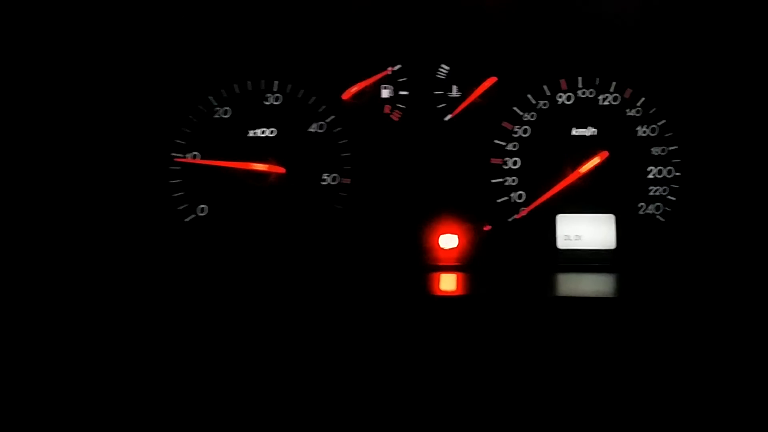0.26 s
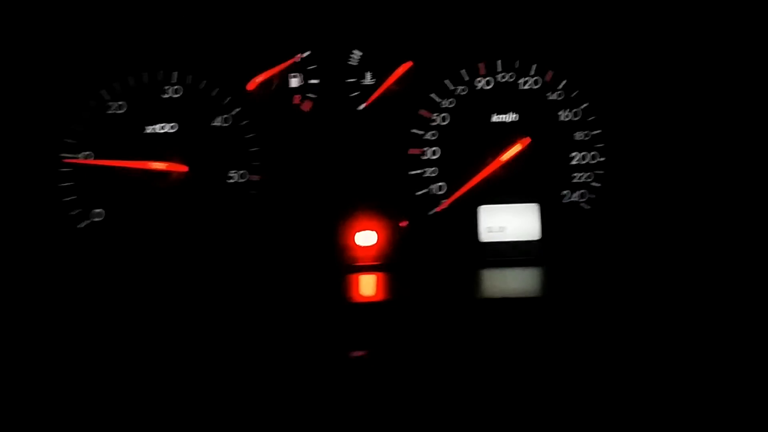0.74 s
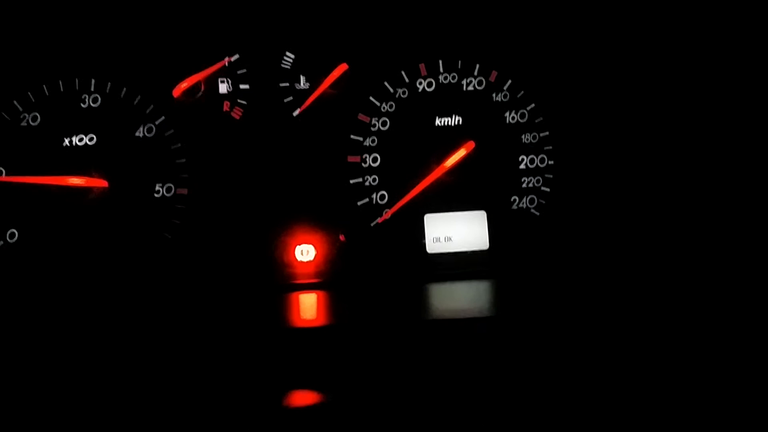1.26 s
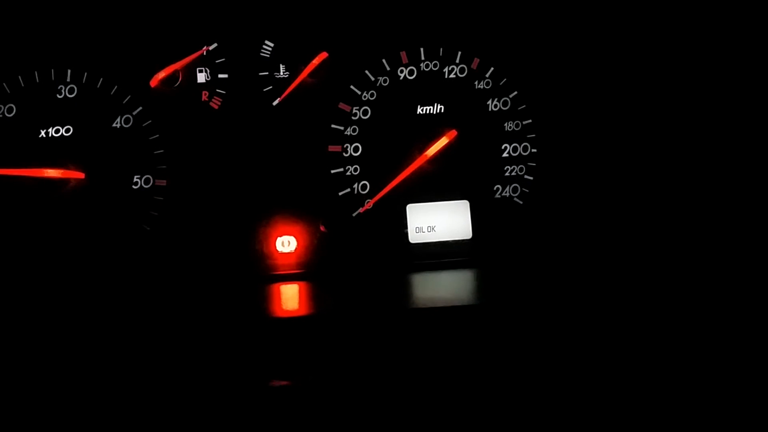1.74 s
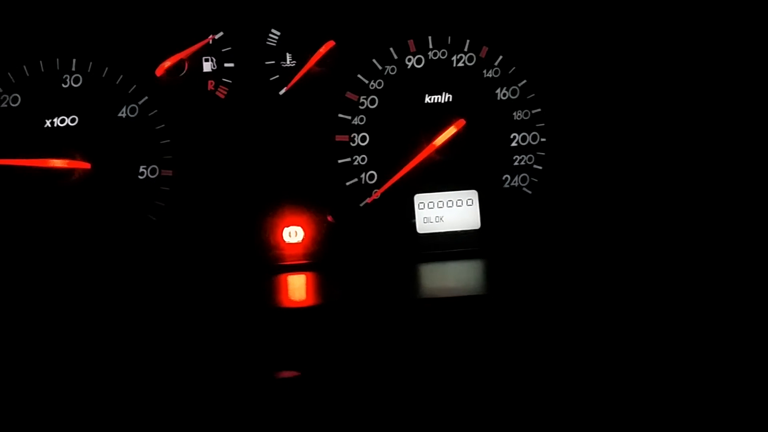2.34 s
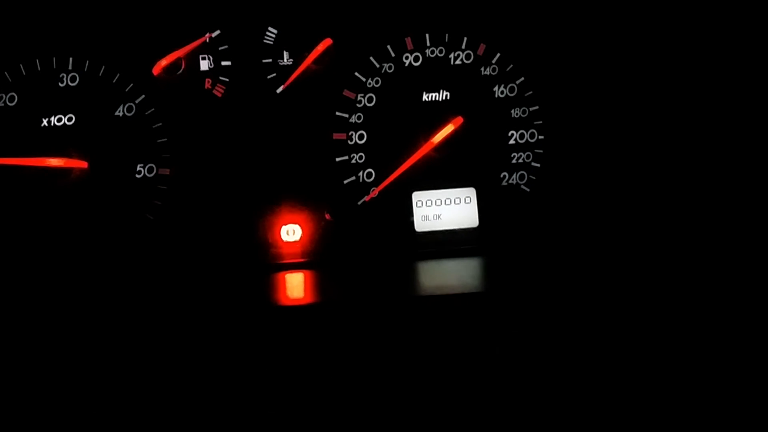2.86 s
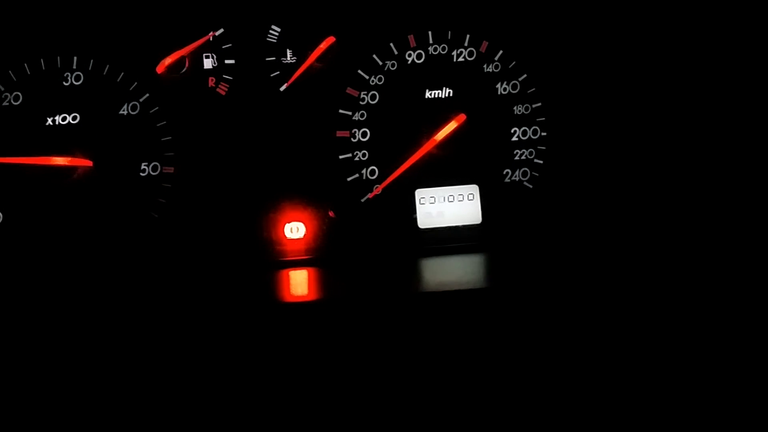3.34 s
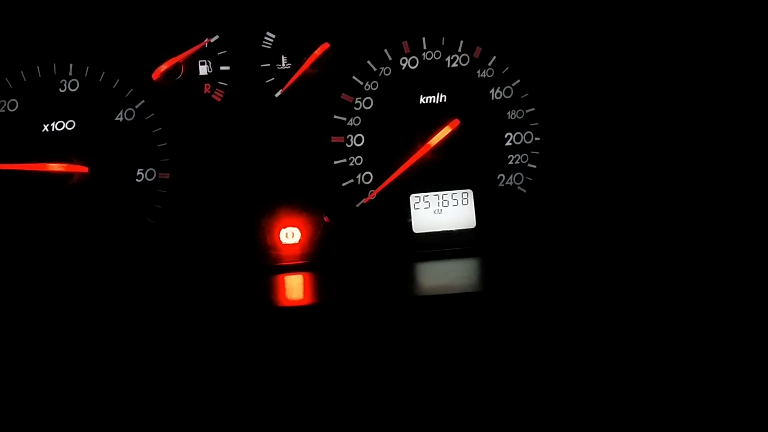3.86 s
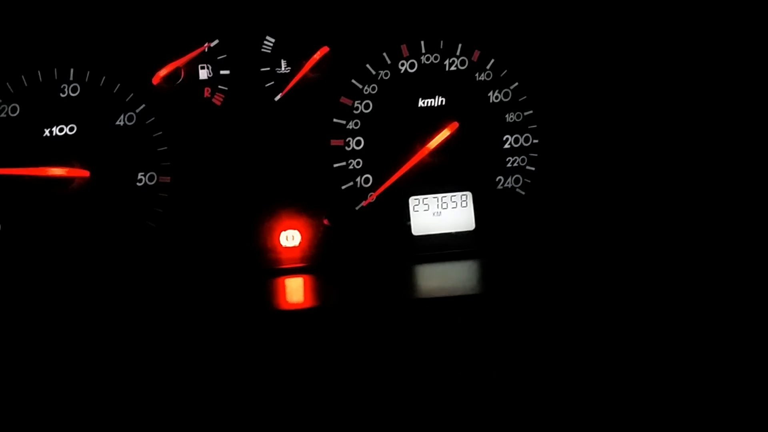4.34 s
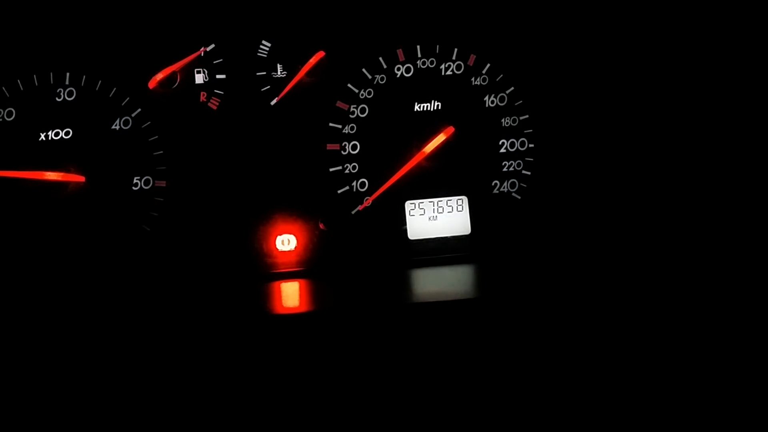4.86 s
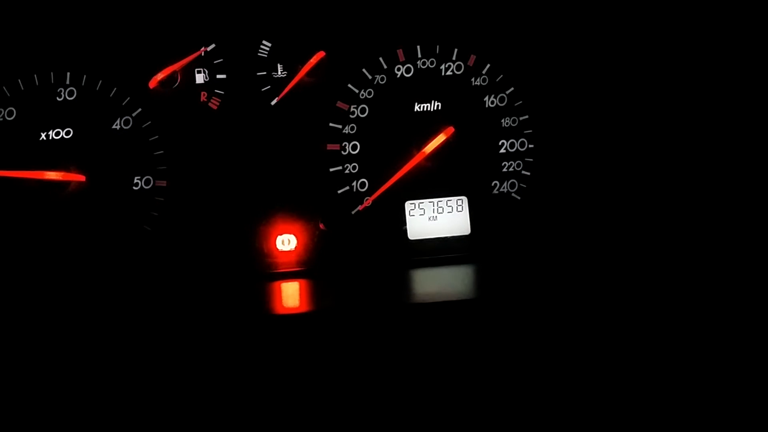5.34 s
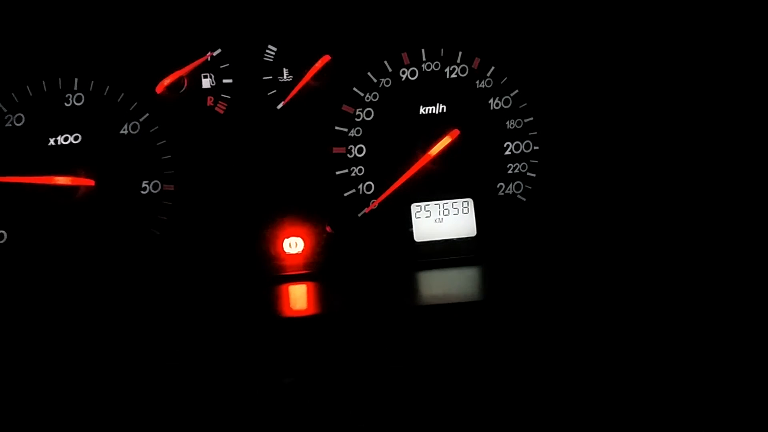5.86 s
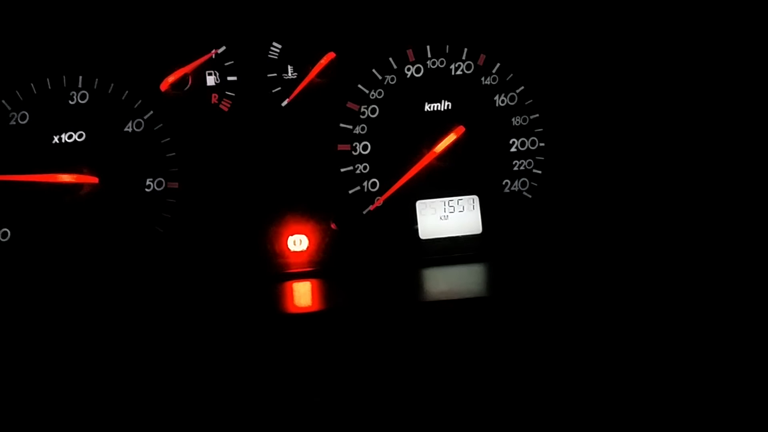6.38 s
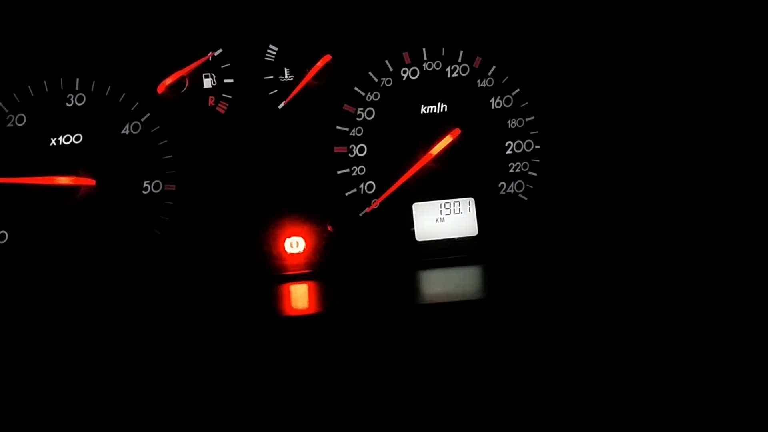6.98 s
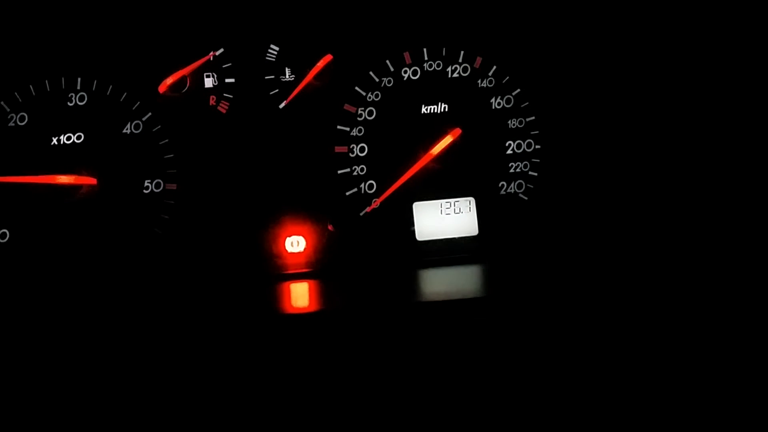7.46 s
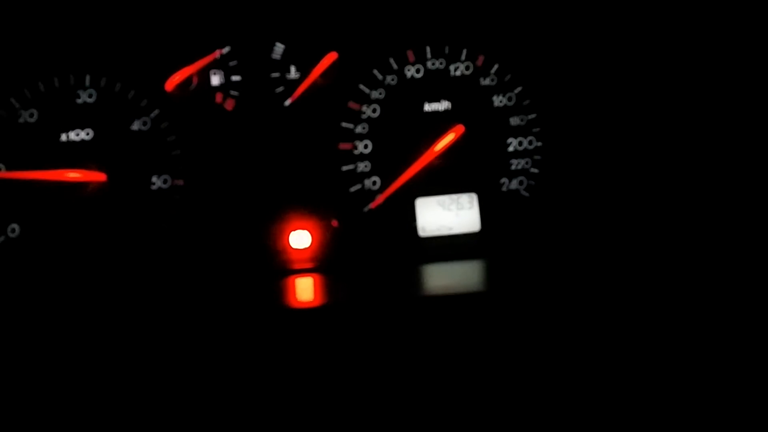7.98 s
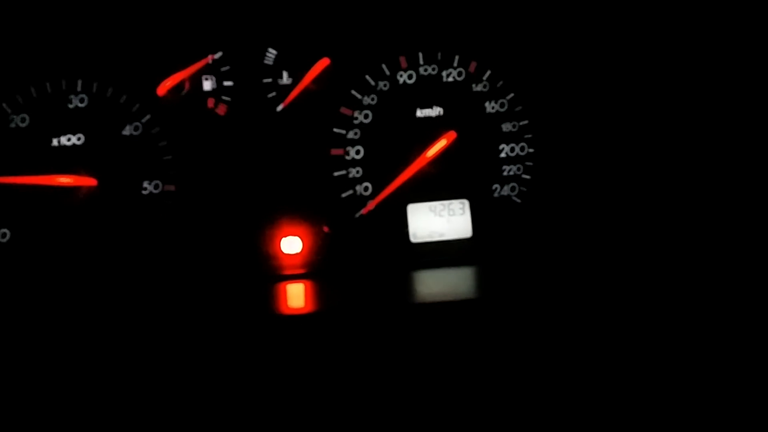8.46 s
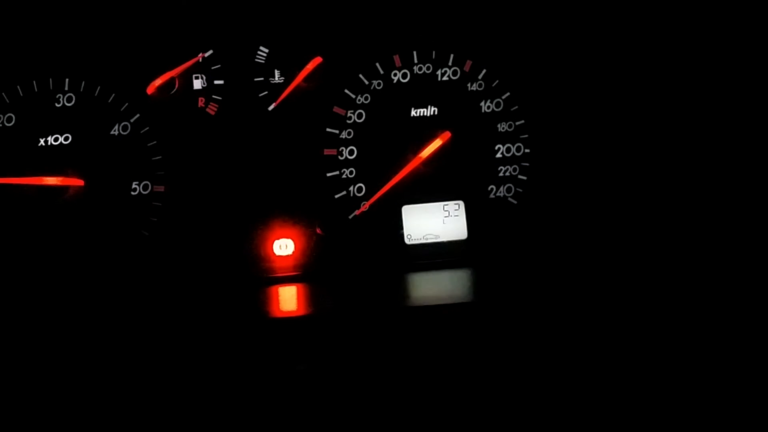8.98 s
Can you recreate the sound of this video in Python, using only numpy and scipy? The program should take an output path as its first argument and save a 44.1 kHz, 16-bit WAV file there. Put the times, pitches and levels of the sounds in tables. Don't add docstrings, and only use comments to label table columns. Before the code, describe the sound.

Inside a small closed car cabin, a cold four-cylinder turbodiesel is already idling at roughly 940 rpm and continues unbroken for about 9.2 seconds. Its deep, boomy drone pulses around 31 times a second, with stacked low harmonics, muffled block clatter and throbbing hiss. Fine valve and injector ticks, soft panel thumps and a rubbery falling thud repeat each engine cycle, about eight times a second. Speed wavers slightly; from about 4.3 to 5.3 seconds it lifts to near 1000 rpm, louder with sharper diesel knock, then eases back. Brief dry creaks of trim or phone case snap at 0.6, 1.6 and 1.8 seconds, faintly at 3.2, barely at 6.0, then at 6.3, 7.2, 8.6 and 8.8. Late on, the tone shifts subtly as the hand moves. The hand-held stereo pickup is fuller left, duller right, with faint hiss and a very high, weak whine.

```python
import sys
import numpy as np
from scipy import signal
from scipy.fft import rfft, irfft, next_fast_len
from scipy.io import wavfile
from scipy.ndimage import uniform_filter1d

SR = 44100
rng = np.random.default_rng(int(sys.argv[2]) if len(sys.argv) > 2 else 0)


def master_out(mix):
    frames = np.transpose(np.atleast_2d(mix))
    ceiling = np.clip(frames, -1, 1)
    pcm = np.round(ceiling * 32767).astype(np.int16)
    wavfile.write(sys.argv[1], SR, pcm)


def undo_db(level):
    steps = np.asarray(level, float) / 20
    return 10 ** steps


N = 406602

# t/s, speed/rpm
GOVERNOR_SPEED = [(0.0, 919.0), (0.37, 971.7), (0.61, 927.7), (0.88, 961.5), (0.89, 926.9), (1.43, 957.5),
                  (2.04, 933.7), (2.37, 968.2), (2.52, 943.1), (4.32, 939.3), (4.32, 997.8), (4.82, 1004.2),
                  (5.26, 967.6), (5.92, 944.5), (7.69, 938.4), (7.83, 957.5), (7.99, 938.0), (9.22, 932.8)]
# order, level off resonance/dB, change as the hand sinks/dB, wander/dB
MAIN_ORDERS = [(2, -41.5, -5, 1.4), (3, -43.5, -3.5, 0.2), (4, -39.5, -7, 1.8), (5, -37.5, 0.5, 1.6),
               (7, -47, -2.5, 1)]
# order, level/dB, wander/dB, lift under load/dB
UPPER_ORDERS = [(6, -47.5, 2.2, 6.5), (8, -59, 4, -3), (9, -58, 3, -14), (10, -64, 6.5, -8),
                (11, -56, 0, 1), (12, -59.5, 3, 11)]
# f/Hz, width/Hz, level/dB
STANDING_WAVES = [(64.1, 3.6, 4), (66.4, 1.2, 0.5), (98.97, 7.74, 13.5), (128.2, 6.9, 4), (134.9, 1.8, -9),
                  (161.56, 5.04, -15.5), (166.5, 3.3, -8), (167, 1.5, 7.5), (220.7, 7.7, 3.5),
                  (228.8, 9, -10)]
# f/Hz, width/Hz
PHASE_MODES = [(67, 3.2), (95.2, 2.7), (97.7, -12), (156.2, 2.8), (188.2, 2), (219.8, 2.3), (225.2, 3)]
# t/s, share of the way/0-1
HAND_SINKING = [
    (0, 0),
    (3, 0.07),
    (5.8, 0.07),
    (7, 0.23),
    (8, 0.29),
    (8.8, 0.94),
    (9.22, 0.3),
]
# f/Hz, level/dB per Hz
BLOCK_SPECTRUM = [(40, -14.5), (110, -6), (260, -9.5), (340, -8), (420, -13.5), (650, -13), (900, -20),
                  (1350, -24), (2200, -29.5), (3900, -34), (6000, -35), (7200, -38), (11000, -45.5),
                  (16000, -47.5)]
# f/Hz, width/Hz, level/dB
BULKHEAD_PANELS = [(495, 51, 7.5), (591, 7.7, 6.5), (813, 14, 7.5), (1817, 117, 5.5), (3030, 48, 6),
                   (4600, 51, 7.5), (6150, 320, 6)]
# place in cycle/0-1, number per cycle, f/Hz, width/Hz, length/ms,
# level at first/dB, level at last/dB
TICKS = [(.81, 1, 2000, 520, 11, -60, -69), (.9, 1, 1950, 500, 15, -60, -71),
         (.05, 1, 1830, 260, 8.5, -62, -58), (.8, 1, 1830, 280, 6.5, -65, -61),
         (.56, 1, 1850, 350, 6.5, -70, -62), (.77, 1, 3050, 400, 6.5, -67, -73),
         (.13, 1, 3250, 400, 4.5, -70, -68), (.02, 1, 3300, 350, 12, -71, -65),
         (.03, 4, 3270, 450, 6.5, -72, -65.5), (.2, 4, 4570, 500, 12, -70, -71),
         (.01, 4, 6150, 800, 9.5, -61.5, -73)]
# place in cycle/0-1, f/Hz, t60/s, level/dB
PANEL_THUMPS = [
    (.0, 115, .3, -51),
    (.22, 338, .09, -54),
    (.5, 500, .04, -58),
    (.6, 480, .04, -59),
    (.33, 700, .035, -61),
    (.02, 620, .04, -60),
]
# t/s, peak level/dB, low ring f/Hz, 5-7 kHz level against it/dB, fade/s
CREAKS = [
    (0.6355, -29.5, 1600, 1.5, 0.0058),
    (1.6148, -37, 1510, -20, 0.0065),
    (1.8055, -29.5, 1590, -7.5, 0.0058),
    (3.1552, -44, 1780, -17, 0.0065),
    (5.9724, -55, 1750, -11, 0.0065),
    (6.3074, -36, 1610, -31, 0.0065),
    (7.15, -33.5, 1560, -16, 0.0077),
    (8.606, -44, 1540, -11, 0.0056),
    (8.8018, -38.5, 1630, -39, 0.0065),
]
# f/Hz, level under the left/dB, likeness/0-1
RIGHT_PORT = [(30, 4, 0.95), (114, 5, 1), (235, 1.5, 0.65), (290, 3, 0.56), (600, 4, 0.7),
              (1110, 2.5, 0.27), (1840, 8, 0.84), (3440, 8, 0), (4570, 7, 0.15), (5530, 13.5, 0),
              (7040, 34, 0), (16000, 8, .1)]

START_CYCLE = .909
FLYWHEEL_S = .127
BLOCK_DB = -36.5
PORT_LAG_S, LAG_FROM_HZ, DETOUR_FROM_HZ = 0.0004, 780, 386
WHINE_HZ, TOP_HZ = 15477, 15545
WHINE_DB, WHINE_FADE_DB_S, WHINE_WANDER_DB = -76, .8, 1.8
TIME = np.arange(N) / SR
PADDED = next_fast_len(N, True)
FREQ = np.maximum(np.arange(PADDED // 2 + 1) * SR / PADDED, 1)


def level(x, db):
    return x * undo_db(db) / np.sqrt(np.mean(x ** 2))


def walk(rate):
    held = np.repeat(rng.standard_normal(int(N / SR * rate) + 2), 32)
    slewed = 1.3 * uniform_filter1d(uniform_filter1d(held, 32), 32)
    return np.interp(TIME * rate * 32, np.arange(len(slewed)), slewed)


def to_freq(x):
    return rfft(x, PADDED)


def to_time(spectrum):
    return irfft(spectrum, PADDED)[..., :N]


def over_freq(hz, value):
    return np.interp(np.log(FREQ), np.log(hz), value)


def resonances(f, modes):
    return sum(db / (1 + (2 * (f - hz) / width) ** 2) for hz, width, db in modes)


def ring(x, hz, t60):
    pole = np.exp(2j * np.pi * hz / SR - np.log(1000) / (t60 * SR))
    return signal.lfilter([1], [1, -pole], x).imag


def band(x, hz, width):
    return signal.lfilter(*signal.iirpeak(hz, hz / width, SR), x)


def steep(x, hz, width):
    return band(band(x, hz, width), hz, width)


def strikes(cycle, places, sizes):
    when = np.arange(len(sizes))[:, None] + places
    index = np.searchsorted(cycle, when.ravel())
    return np.bincount(index, sizes.ravel() * (index > 0), N + 1)[:N]


def rattle(cycle, count, places, ms, fresh=.4):
    hit = strikes(cycle, places, undo_db(1.2 * rng.standard_normal((count, len(places)))))
    age = np.arange(2048) / SR * 1000 / ms
    shape = age * np.exp(-2 * age)
    same = signal.oaconvolve(hit, shape * rng.standard_normal(2048))[:N]
    return same + fresh * signal.oaconvolve(hit, shape)[:N] * rng.standard_normal(N)


def order_levels(rpm, load):
    orders = [(1, -34.3 + 4.2 * uniform_filter1d(load, SR // 2, origin=SR // 5))]
    sunk = np.interp(TIME, *np.transpose(HAND_SINKING))
    for k, db, sunk_db, wander_db in MAIN_ORDERS:
        cabin_db = resonances(k * rpm / 30, STANDING_WAVES)
        orders.append((k, db + cabin_db + sunk_db * sunk + wander_db * walk(4)))
    for k, db, wander_db, lift_db in UPPER_ORDERS:
        orders.append((k, db + wander_db * walk(3.5) + lift_db * load ** 2))
    return orders


def boom(rpm, cycle, load):
    out = 0
    for k, db in order_levels(rpm, load):
        hz = k * rpm[::64] / 30
        lag = sum(np.arctan2(hz * width, centre ** 2 - hz ** 2) for centre, width in PHASE_MODES)
        lag = np.interp(TIME, TIME[::64], lag)
        uneven = 1 + 0.094 * walk(14) * min(k / 2.6, 1)
        jitter = 0.082 * walk(9) * (k > 1)
        tone = np.cos(8 * np.pi * k * cycle - lag + jitter)
        out = out + np.sqrt(2) * undo_db(db + 1.5) * uneven * tone
    return out


def block(cycle, count, load):
    db = over_freq(*np.transpose(BLOCK_SPECTRUM)) + resonances(FREQ, BULKHEAD_PANELS)
    repeat = 0.55 / (1 + (FREQ / 1100) ** 2)
    paths = []
    for _ in range(2):
        sizes = signal.lfilter([1], [1, -.8], rng.standard_normal((count, 90)), axis=0)
        sizes = sizes * undo_db(0.78 * rng.standard_normal(90))
        clatter = level(strikes(cycle, rng.random(90), sizes), 0)
        throb = 1 + 0.15 * np.cos(8 * np.pi * (cycle - .02))
        hiss = level(throb * undo_db(walk(9)) * rng.standard_normal(N), 0)
        mix = np.sqrt(repeat) * to_freq(clatter) + np.sqrt(1 - repeat) * to_freq(hiss)
        paths.append(level(to_time(undo_db(db) * mix), BLOCK_DB))
    return np.array(paths) * undo_db(0.82 * load - 0.18 * TIME + 0.39 * walk(1.59))


def ticks(cycle, count):
    out = 0
    for place, per, hz, width, ms, first_db, last_db in TICKS:
        tick = steep(rattle(cycle, count, place + np.arange(per) / per, ms), hz, width)
        drift_db = first_db + (last_db - first_db) * TIME / TIME[-1]
        out = out + level(tick, 0) * undo_db(drift_db + .8 * walk(1.1))
    return out


def knock(cycle, count, load):
    blow = rattle(cycle, count, .175 + np.arange(4) / 4, .9, fresh=.5)
    sound = level(steep(blow, 5200, 2000), 0) + level(steep(blow, 3100, 1800), .5)
    late_load = np.roll(load, SR // 9)
    return level(sound, -55) * np.clip(late_load ** 1.5, .085, 1)


def thumps(cycle, count):
    out = 0
    for k, (place, hz, t60, db) in enumerate(PANEL_THUMPS):
        sizes = undo_db(1.3 * rng.standard_normal((count, 1)))
        blow = (-1) ** k * strikes(cycle, place, sizes)
        thump = level(ring(ring(blow, hz, t60), hz, t60), db)
        out = out + thump * undo_db(.9 * walk(1.2) + 1.5 - .3 * TIME)
    return out


def mount(cycle, count):
    age = np.arange(3000) / SR
    turns = np.cumsum(215 + 165 * np.exp(-age / .016)) / SR
    swell = age ** 1.5 * np.exp(-age / .0105)
    blow = strikes(cycle, .89, undo_db(rng.standard_normal((count, 1))))
    sound = signal.oaconvolve(blow, swell * np.sin(2 * np.pi * turns))[:N]
    return level(sound, -41.5) * undo_db(0.3 * walk(1.25) - 0.24 * TIME)


def creaks():
    out = np.zeros(N)
    age = np.arange(4096) / SR
    for s, db, hz, bright_db, fade_s in CREAKS:
        snap = 1 + 0.51 * np.exp(-age / 0.00013)
        slip = rng.standard_normal(4096) * np.exp(-age / fade_s) * snap
        low, middle = steep(slip, hz, 420), steep(slip, 2340, 1640)
        body = low / low.std() + middle / middle.std()
        body = body + .3 * steep(slip, 3700, 1800) / middle.std()
        bright = steep(slip, 5670, 1460) + 0.13 * band(slip, 9000, 7000)
        sound = body / np.abs(body).max() + undo_db(bright_db) * bright / np.abs(bright).max()
        start = int(s * SR)
        out[start:start + 4096] += undo_db(db + 7) * sound / np.abs(sound).max()
    return out


def detour(x, spread_s=.006):
    random_delay = np.interp(FREQ, np.arange(0, SR, 90), rng.random(SR // 90))
    delay = spread_s * random_delay * (FREQ > DETOUR_FROM_HZ)
    turns = .25 + np.cumsum(delay) * SR / PADDED
    return to_time(to_freq(x) * np.exp(-2j * np.pi * turns))


def ports(direct, other):
    hz, down_db, like = np.transpose(RIGHT_PORT)
    like = np.clip(over_freq(hz, like), 0, 1)
    lag_s = PORT_LAG_S / (1 + (LAG_FROM_HZ / FREQ) ** 6)
    direct = to_freq(direct)
    shared = like * direct + np.sqrt(1 - like ** 2) * to_freq(other)
    right = undo_db(-over_freq(hz, down_db)) * shared
    return to_time([np.exp(-2j * np.pi * FREQ * lag_s) * direct, right])


def scene():
    smooth = int(FLYWHEEL_S * SR)
    called = np.interp(TIME, *np.transpose(GOVERNOR_SPEED))
    rpm = uniform_filter1d(uniform_filter1d(called, smooth), smooth)
    cycle = START_CYCLE + np.cumsum(rpm) / 120 / SR
    count = int(cycle[-1]) + 2
    load = np.clip((rpm - 955) / 45, 0, 1)
    rumble, rumble_other = block(cycle, count, load)
    parts = boom(rpm, cycle, load) + ticks(cycle, count) + knock(cycle, count, load)
    parts = parts + thumps(cycle, count) + mount(cycle, count) + creaks()
    return ports(parts + rumble, detour(parts) + rumble_other)


def low_pass(x):
    return signal.sosfilt(signal.butter(12, 15700, fs=SR, output="sos"), x)


def record(dry):
    hiss = signal.lfilter([1, -.5], [1], rng.standard_normal(dry.shape)) * undo_db(-67.5 + .5 * walk(13))
    whine_db = WHINE_DB - WHINE_FADE_DB_S * TIME + WHINE_WANDER_DB * walk(1.47)
    whine_db = whine_db + np.array([[4], [-7]])
    whine = np.sqrt(2) * np.sin(2 * np.pi * WHINE_HZ * TIME) * undo_db(whine_db)
    wet = to_time(to_freq(dry + hiss + whine) * (FREQ < TOP_HZ))
    return low_pass(wet)


dry = scene()
out = record(dry)
master_out(out)
```